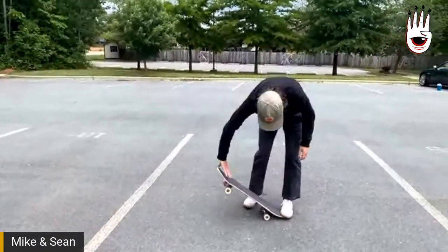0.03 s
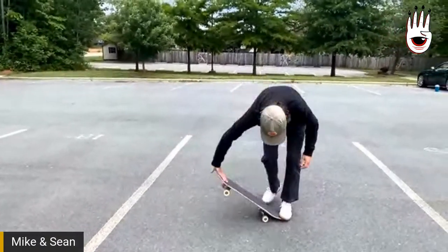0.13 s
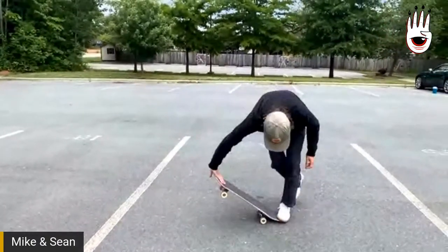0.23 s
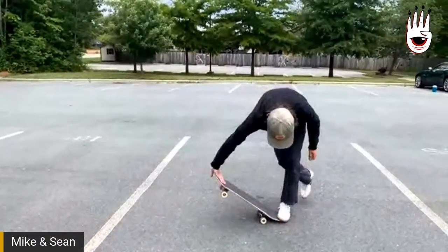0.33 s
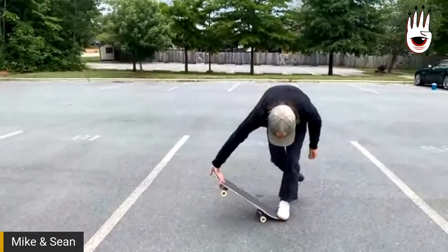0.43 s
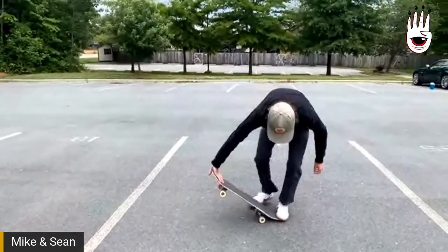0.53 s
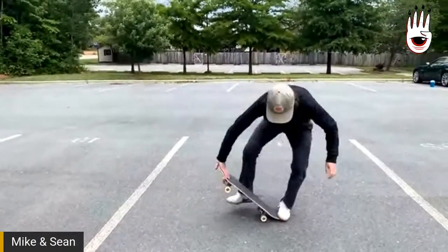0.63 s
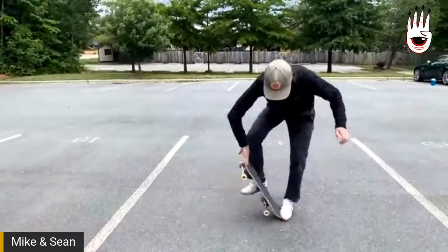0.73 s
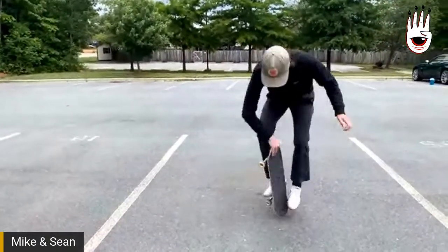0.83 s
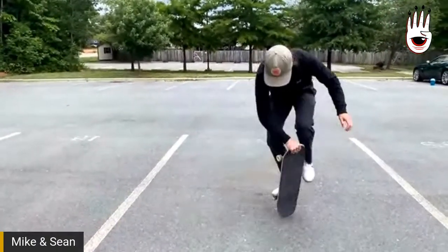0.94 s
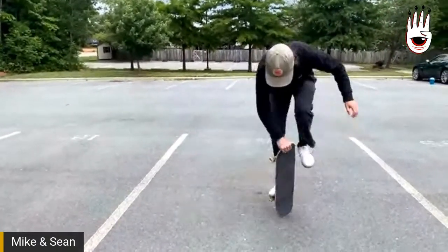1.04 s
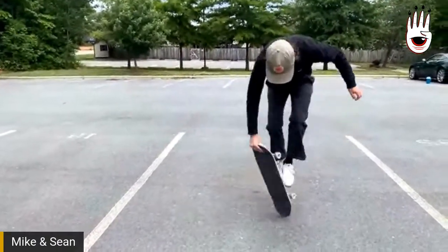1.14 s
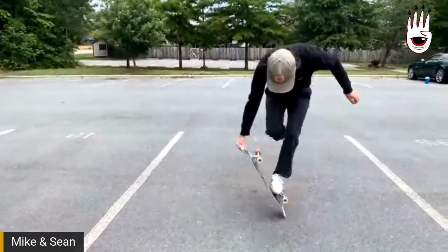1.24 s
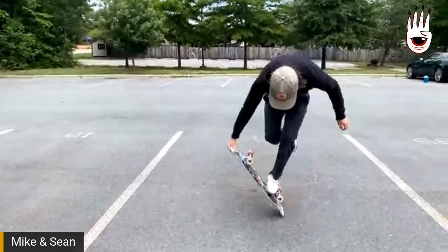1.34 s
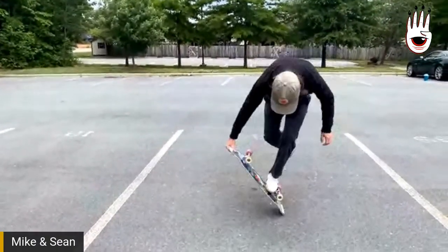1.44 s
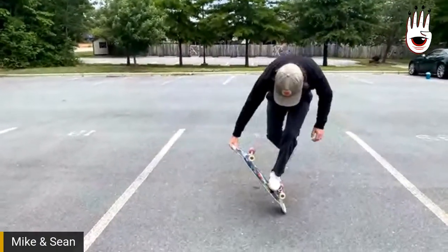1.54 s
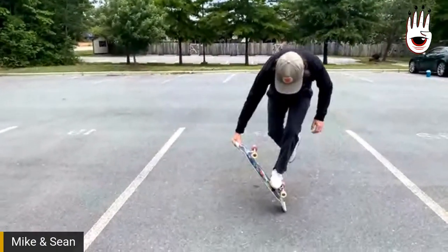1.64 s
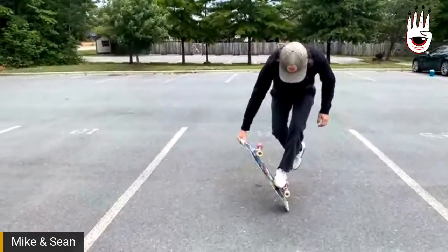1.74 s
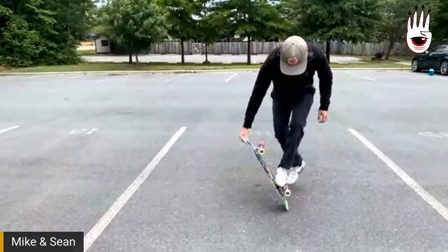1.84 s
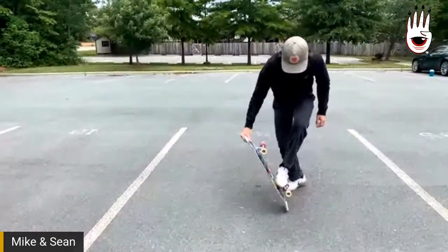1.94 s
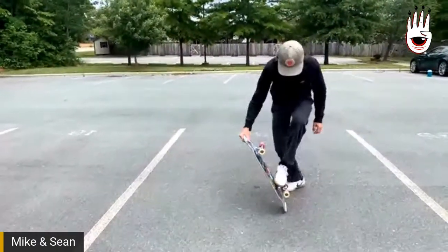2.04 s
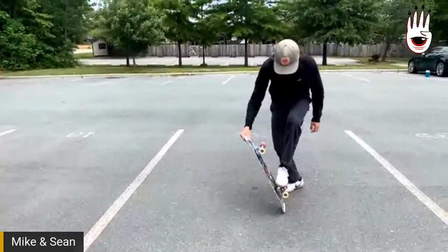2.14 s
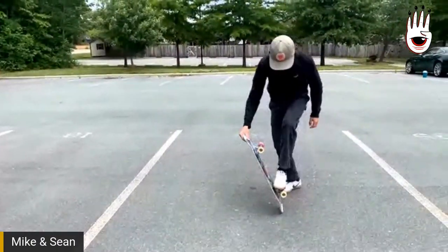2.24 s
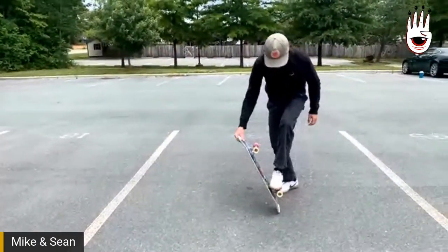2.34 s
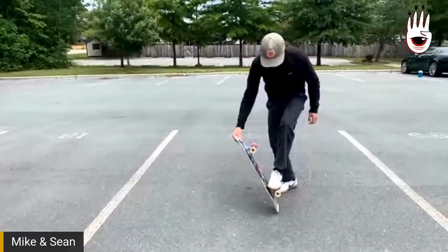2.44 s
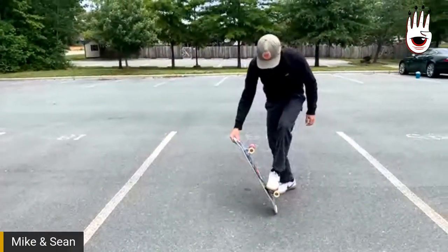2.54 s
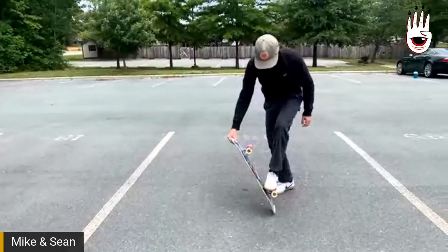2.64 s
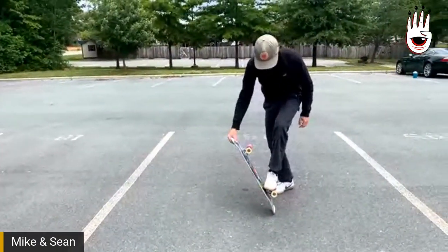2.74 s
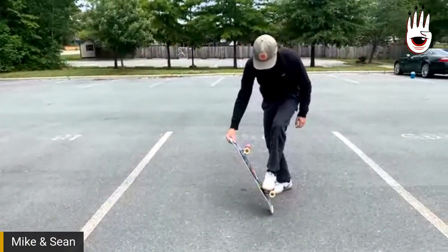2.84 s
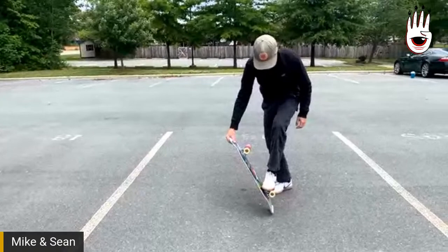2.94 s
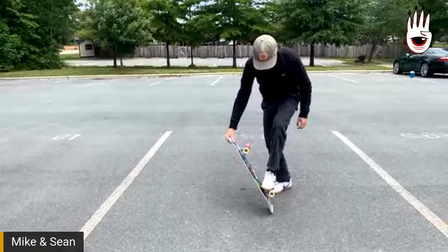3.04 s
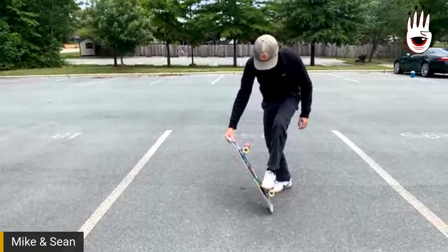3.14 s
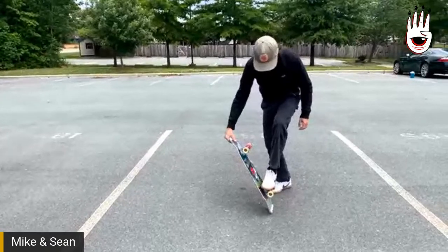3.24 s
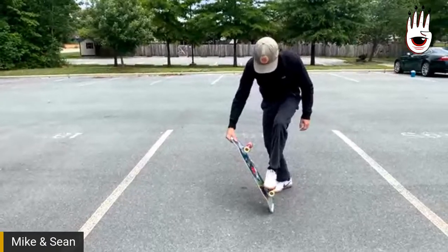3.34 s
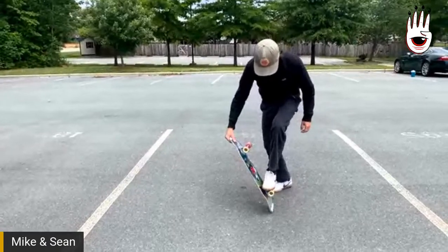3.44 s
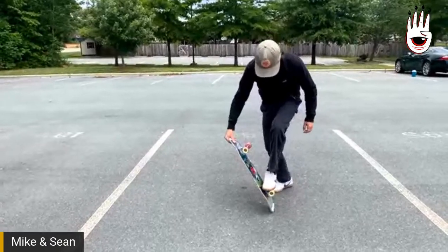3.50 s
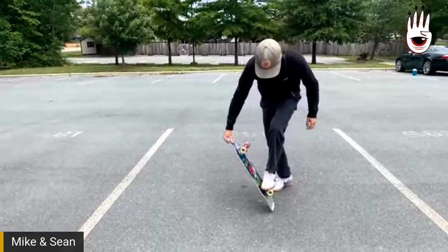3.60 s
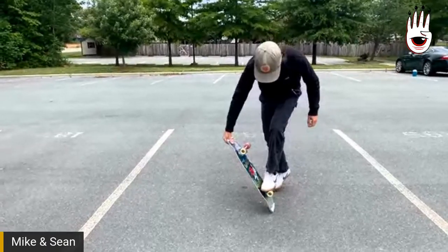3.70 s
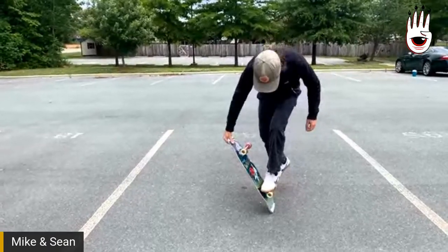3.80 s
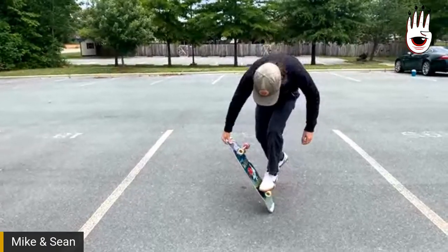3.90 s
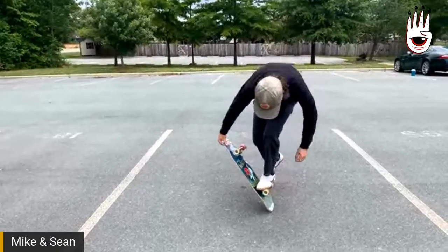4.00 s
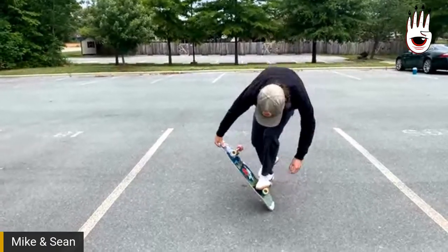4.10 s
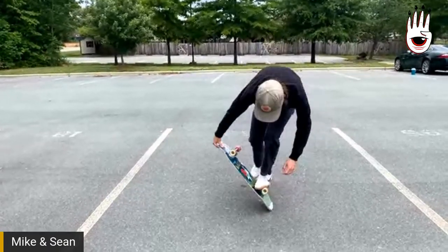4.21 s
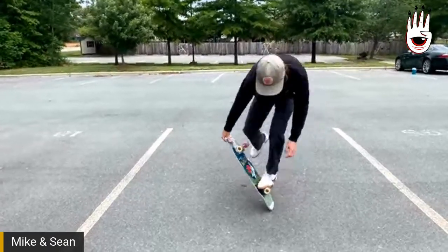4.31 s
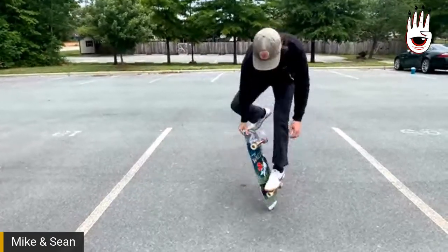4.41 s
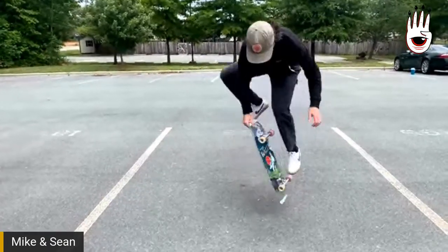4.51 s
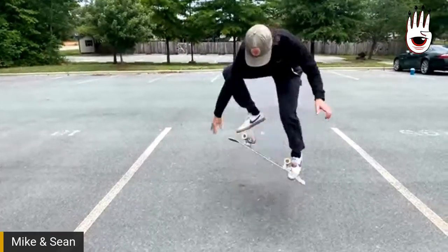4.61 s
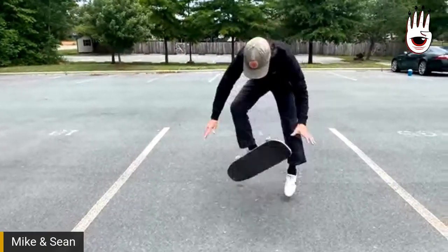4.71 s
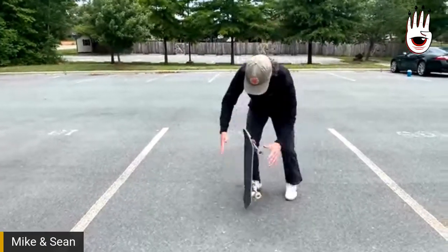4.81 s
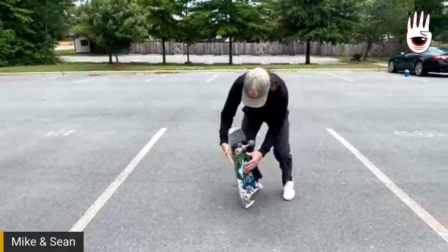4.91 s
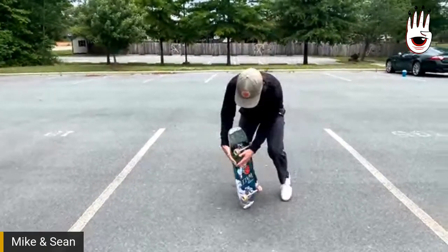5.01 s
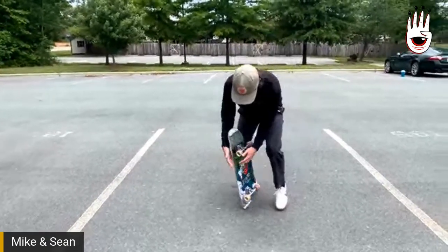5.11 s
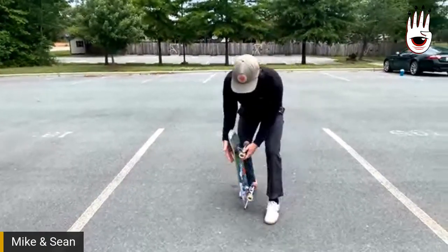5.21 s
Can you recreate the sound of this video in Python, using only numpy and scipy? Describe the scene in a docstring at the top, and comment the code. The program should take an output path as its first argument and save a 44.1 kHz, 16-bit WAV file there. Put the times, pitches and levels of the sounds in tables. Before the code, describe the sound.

In an open asphalt car park, a skateboard ticks and scrapes softly, then its tail knocks the ground in a tight rattling burst with lighter taps after. A long near-silence follows, with tiny metallic ticks, low distant traffic and thin bird chirps. Finally a short scuff and squeak lead to a knock and one very loud, sharp clack. The board is close to the microphone, dry with a faint outdoor tail.

```python
"""Skateboard trick on a car park

Place: an empty asphalt car park; a skateboarder tries a trick, holding the board by its nose.
Close to the microphone the tail scrapes and knocks, the trucks tick under his shoe, the sole squeaks, and
the board flips and lands with one sharp clack. Blows and drags ring decaying modes of wood and metal over noisy grit.
Far off, traffic rumbles as coloured noise and birds chirp faintly in the trees as trilled sines.
Asphalt, fence and trees send back a faint tail of decaying noise."""
import sys
import numpy as np
from scipy import signal
from scipy.fft import rfft, irfft, next_fast_len
from scipy.io import wavfile

SR = 44100
rng = np.random.default_rng(int(sys.argv[2]) if len(sys.argv) > 2 else 0)


def to_wav(sig):
    """Store sig (one row per channel, or 1-D mono) as 16-bit WAV at the path in sys.argv[1].

    Samples outside -1..1 are clipped; the rate is SR.
    """
    pcm = np.clip(np.atleast_2d(sig), -1, 1) * 32767
    pcm = np.round(pcm).astype(np.int16)
    wavfile.write(sys.argv[1], SR, pcm.T)  # frames by channels


N = 231789   # samples

# bending modes of the wooden deck: (frequency [Hz], relative level [dB], undamped t60 [s])
DECK_MODES = [(90, -21, 0.012), (162, -11, 0.012), (294.2, -3.5, 0.048), (495, -12, 0.028),
              (662, 3.5, 0.014), (786.5, -1.5, 0.023), (966, -12, 0.019), (1162, -19.5, 0.047),
              (1303, -22.5, 0.075), (1430, -15, 0.031), (1617, -19.5, 0.06), (1717, -15.5, 0.037),
              (1895, -11, 0.016), (2094, -22.5, 0.043), (2337, -15, 0.026), (2660, -14.5, 0.027),
              (2918, -7.5, 0.014), (2942, -14, 0.038), (2982, -8.5, 0.0062), (3740, -16, 0.02),
              (4260, -17, 0.015), (5280, -26.5, 0.046), (6200, -26, 0.027)]
# modes of a metal truck: (frequency [Hz], relative level [dB], t60 [s])
TRUCK_MODES = [(1070, 13.5, 0.01), (1760, -9.5, 0.013), (2510, -15, 0.0056), (2934, -0.5, 0.0067),
               (3430, -16, 0.019), (3920, -5, 0.011), (4940, -7, 0.0085), (8800, -9, 0.033),
               (9800, -7, 0.026), (10760, 3, 0.00442), (12600, -21, .002)]
# the deck strikes the asphalt, then rattles and skids: (time [s], peak level [dB], centre of excited modes [Hz],
#   their spread [octaves], contact time [s], grit crack level [dB], rattle level [dB],
#   skidding grit level [dB], rattle t60 [s])
DECK_KNOCKS = [(0.923, -19.5, 1430, 2, 0.00058, -33, -24.5, -36.5, 0.097),
               (0.9438, -19, 1920, 1.74, 0.00096, -26, -32.5, -38, 0.065),
               (.9660, -19, 1490, 0.49, 0.00096, -28.5, -32.5, -45.5, 0.099),
               (1.1658, -27.5, 2980, 0.96, 0.0043, -34, -41, -41, 0.27),
               (1.281, -25, 1660, 0.89, 0.00049, -26, -49.5, -51.5, 0.23),
               (4.5473, -19.5, 970, 0.84, 0.0038, -25.5, -43.5, -45, 0.17),
               (4.8607, 7, 842, 3.4, 0.0014, -8.5, -35, -38.5, 0.33),
               (4.955, -26.5, 1280, 1.9, 0.0028, -40, -42.5, -47.5, 0.27)]
# light, clean taps on the deck from shoe, hand or a glancing touch:
#   (time [s], peak level [dB], centre of excited modes [Hz])
DECK_TAPS = [(1.225, -33, 435), (1.2660, -26.5, 1190), (4.8035, -26.5, 1100), (4.848, -16, 1096),
             (4.8568, -15.5, 1255), (4.9850, -34.5, 1450)]
# ticks of the trucks: (time [s], peak level [dB], centre of excited modes [Hz], grit crack level [dB])
TRUCK_TICKS = [(.0315, -37, 2250, -56.5), (0.15, -43.5, 2135, -56), (0.1958, -48.5, 3870, -41.5),
               (.6680, -45, 4430, -38.5), (0.6867, -40.5, 3170, -41), (0.828, -31.5, 3500, -33.5),
               (1.1683, -27.5, 5000, -42), (1.9471, -40, 2020, -52), (1.9552, -33, 2150, -41),
               (2.4568, -53.5, 13100, -77), (3.4400, -61, 6000, -40), (3.4737, -70, 7000, -51),
               (3.9320, -40, 3400, -38), (4.443, -65, 8020, -52)]
# wood and shoe dragged over asphalt: (peak time [s], length [s], deck level [dB], centre of excited modes [Hz],
#   their spread [octaves], grit level [dB])
DRAG_STROKES = [(0.198, 0.15, -57.5, 2050, 1.6, -63), (0.679, .11, -57.5, 3040, 0.47, -56),
                (0.826, .12, -56, 3220, 0.74, -54), (1.116, 0.062, -62, 1370, 0.51, -62),
                (3.256, 0.11, -73.5, 2850, 1.15, -81), (3.476, 0.073, -89, 3510, 1.23, -59),
                (4.48, .115, -52, 1430, 1.7, -54)]
# colour of crushed grit: (frequency [Hz], relative level [dB])
GRIT_COLOUR = [(50, -46), (300, -5), (1200, -1.5), (3200, -7), (4300, -6.5), (5500, -7), (7100, -5),
               (8600, 4), (10600, -3), (11700, -11), (12700, -31), (15500, -31.5)]
# song of a small bird, whistles and buzzes: (start [s], length [s], pitch [Hz],
#   trill swing times the root of 2 [Hz], level [dB])
BIRD_SONG = [(2.614, 0.068, 7380, 30, -69), (2.634, 0.1, 8050, 1130, -64.5), (2.767, 0.077, 7580, 850, -68),
             (2.778, 0.07, 6540, 120, -76.5), (2.868, 0.1, 6700, 1100, -82)]
# one falling chirp, repeated by a farther bird: (start [s], length [s], pitch [Hz], level [dB])
FAR_CALLS = [(0.49, 0.073, 2920, -75), (2.315, .096, 2870, -76.5), (3.705, 0.12, 3040, -85),
             (4.106, .11, 2640, -79.5), (4.619, 0.041, 3230, -63.5)]
# colour of the far traffic: (frequency [Hz], relative level [dB per Hz])
TRAFFIC_COLOUR = [(15, -64), (25, -16), (49, -15), (82, -6), (178, 0), (209, -5), (246, -6), (389, -11.5),
                  (433, -12), (1660, -22.5), (1900, -27), (2420, -29), (5010, -43), (9050, -41.5),
                  (15500, -61)]
# colour of the sound scattered back by the lot: (frequency [Hz], relative level [dB])
LOT_COLOUR = [(100, -13.5), (300, 0.5), (1500, 2), (3000, 0), (6000, -10), (9000, -7), (14000, -18.5)]

SKID_LEAD_S = 0.018   # the edge grazes the ground this long before the blow
BOUNCE_S, BOUNCE_JITTER = 0.012, 0.12   # time between rebounds; its unevenness as a share
RATTLE_HZ, RATTLE_OCTAVES = 1630, 1.51   # modes that rebounds and skids excite
REBOUND_CONTACT_S, REBOUND_CHANCE_DB = 0.0008, 3.0
REBOUND_ABOVE_SKID_DB, REBOUND_GRIT_DB = 9.0, 7.0   # peak of a rebound over the skid's deck and grit levels

# while he balances, the trucks also tick faintly at random
BALANCING_S = (2.0, 4.4)   # start and end
FAINT_TICK_DB, FAINT_TICK_HZ, FAINT_GRIT_DB = -68, 8000, -63

SCRAPE_RISE = 0.5   # share of a stroke spent swelling
SCRAPE_EDGE_DB = -25   # a stroke swells from this level and fades back to it
SQUEAK_S, SQUEAK_LENGTH_S, SQUEAK_HZ, SQUEAK_DB = 4.456, 0.046, 790, -52
SQUEAK_WAVER, SQUEAK_UNEVEN_DB = 0.07, 5.0

LOT_T60_S, LOT_DB = 0.23, -33.5
SONG_TRILL_HZ, SONG_WAVER = 800, 0.38
# the swing of the far call is its depth over the root of 2
CALL_TRILL_HZ, CALL_DEPTH_HZ, CALL_WAVER, CALL_SAG_HZ_PER_S = 399, 442, 0.785, 2190
TRAFFIC_DB = -62
CUTOFF_HZ = 15800


def knocks(crack_t60=0.017):
    """Each blow rings the deck and crushes some grit; the board rebounds and skids."""
    out = np.zeros(N)
    for s, db, centre_hz, octaves, contact_s, grit_db, rattle_db, skid_grit_db, t60 in DECK_KNOCKS:
        add(out, s, blow(db, centre_hz, octaves, contact_s))
        add(out, s, from_db(grit_db) * pressed(crack(crack_t60), contact_s))
        add(out, s, rebounds(rattle_db, skid_grit_db, t60))
        add(out, s - SKID_LEAD_S, skid(rattle_db, skid_grit_db, t60))
    return out


def blow(db, centre_hz, octaves, contact_s):
    """One contact rings the deck."""
    return from_db(db) * pressed(deck(centre_hz, octaves), contact_s)


def rebounds(db, grit_db, t60, crack_t60=0.021, count=9):
    """The deck chatters on the ground in a dying run of touches, each at a new spot and crushing a little grit."""
    out = np.zeros(SR // 2)
    for k, (late, strength, spot) in enumerate(rng.standard_normal((count, 3)), 1):
        s = BOUNCE_S * (k + BOUNCE_JITTER * late)
        fall_db = -60 * s / t60
        touch_db = fall_db + REBOUND_CHANCE_DB * strength
        centre_hz = RATTLE_HZ * 2 ** (0.3 * spot)
        add(out, s, blow(db + REBOUND_ABOVE_SKID_DB + touch_db, centre_hz, RATTLE_OCTAVES, REBOUND_CONTACT_S))
        grit_crack = pressed(crack(crack_t60), REBOUND_CONTACT_S)
        add(out, s, from_db(grit_db + REBOUND_GRIT_DB + touch_db) * grit_crack)
    return out


def skid(db, grit_db, t60, lead_db=-34, grit_fades=1.3):
    """The edge digs in just before a blow and slides to rest after it; the grit fades faster."""
    t = seconds(0.35) - SKID_LEAD_S   # zero at the blow
    rise_db = lead_db * np.maximum(-t, 0) / SKID_LEAD_S
    fall_db = -60 * np.maximum(t, 0) / t60
    deck_db = db + rise_db + fall_db
    crunch_db = grit_db + rise_db + grit_fades * fall_db
    return dragged(deck_db, crunch_db, RATTLE_HZ, RATTLE_OCTAVES)


def taps(octaves=0.39, contact_s=0.00087, damping=2.1, grit_db=-27, crack_t60=0.016):
    """A light touch rings only a few neighbouring modes, damps them and hardly stirs the grit."""
    out = np.zeros(N)
    for s, db, centre_hz in DECK_TAPS:
        add(out, s, from_db(db) * pressed(deck(centre_hz, octaves, damping), contact_s))
        add(out, s, from_db(db + grit_db) * pressed(crack(crack_t60), contact_s))
    return out


def ticks(octaves=0.56, contact_s=0.0012, crack_t60=0.016,
          chatter_per_s=1500, chatter_db=1.5, chatter_t60=0.019):
    """Loose metal chatters for an instant as weight comes on and off the board."""
    out, t = np.zeros(N), seconds(0.03)
    for s, db, centre_hz, grit_db in TRUCK_TICKS + faint_ticks():
        chatter = grains(len(t), chatter_per_s, chatter_db)
        chatter[0] = 2   # a firm first touch
        chatter = chatter * from_db(-60 * t / chatter_t60)
        metal = driven(chatter, ringing(TRUCK_MODES, centre_hz, octaves))
        add(out, s, from_db(db) * pressed(metal, contact_s))
        add(out, s, from_db(grit_db) * pressed(crack(crack_t60), contact_s))
    return out


def faint_ticks(count=5):
    """Small shifts of weight while he balances, as rows like those of TRUCK_TICKS."""
    shares = (np.arange(count) + rng.random(count)) / count
    times = np.interp(shares, [0, 1], BALANCING_S)
    chance_db = 2 * rng.standard_normal(count)
    return [(s, FAINT_TICK_DB + db, FAINT_TICK_HZ, FAINT_GRIT_DB + db) for s, db in zip(times, chance_db)]


def scrapes():
    """Wood and shoe drag over the asphalt; each stroke swells and fades."""
    out = np.zeros(N)
    for peak, length, db, centre_hz, octaves, grit_db in DRAG_STROKES:
        t, rise_s = seconds(length), SCRAPE_RISE * length
        swell_db = np.interp(t, [0, rise_s, length], [SCRAPE_EDGE_DB, 0, SCRAPE_EDGE_DB])
        add(out, peak - rise_s, dragged(db + swell_db, grit_db + swell_db, centre_hz, octaves))
    return out


def dragged(swell_db, grit_swell_db, centre_hz, octaves, catches_per_s=220, catch_db=5.5,
            slips_per_s=1600, slip_db=3.0, grit_per_s=9000, grit_spread_db=5.0, damping=2.1):
    """A sliding contact keeps catching; tiny slips drive the deck, damped by the contact, and crunch the grit."""
    count = len(swell_db)
    catching_db = catch_db * drift(count, catches_per_s)
    slips = rms_one(grains(count, slips_per_s, slip_db)) * from_db(swell_db + catching_db)
    out = driven(slips, deck(centre_hz, octaves, damping))
    crunch = coloured(grains(count, grit_per_s, grit_spread_db), GRIT_COLOUR)
    add(out, 0, from_db(grit_swell_db + catching_db) * crunch)
    return out


def squeak(waver_per_s=300, centre_hz=1500, octaves=2.2):
    """As he pushes off, the rubber sole sticks and slips at a wavering rate, with uneven force, and drives the deck."""
    out, count = np.zeros(N), len(seconds(SQUEAK_LENGTH_S))
    cycles = np.cumsum(SQUEAK_HZ * (1 + SQUEAK_WAVER * drift(count, waver_per_s))) / SR
    uneven = from_db(SQUEAK_UNEVEN_DB * rng.standard_normal(count))
    slips = np.diff(np.floor(cycles), prepend=0) * uneven   # one click per whole cycle
    force = rms_one(slips * signal.windows.tukey(count, 0.5))
    add(out, SQUEAK_S, from_db(SQUEAK_DB) * driven(force, deck(centre_hz, octaves)))
    return out


def deck(centre_hz, octaves, damping=1, lowest_hz=105):
    """A narrow plank radiates little below the modes that are excited."""
    corner_hz = max(centre_hz / 2 ** (1 + octaves), lowest_hz)
    high_pass = signal.butter(2, corner_hz, "high", fs=SR, output="sos")
    return signal.sosfilt(high_pass, ringing(DECK_MODES, centre_hz, octaves, damping))


def ringing(modes, centre_hz, octaves, damping=1, chance_db=0.5):
    """Answer of a body to one blow; the place and hardness of the contact decide which modes ring."""
    t = seconds(0.12)
    hz, db, t60 = np.transpose(modes)[:, :, None]
    away = np.log2(hz / centre_hz) / octaves
    strength = from_db(chance_db * rng.standard_normal(hz.shape)) / (1 + away ** 2) ** 2
    sines = from_db(db - 60 * damping * t / t60) * np.sin(2 * np.pi * hz * t)
    signs = (-1) ** np.arange(len(modes))   # neighbouring modes start in opposite directions
    return signs @ (strength * sines)


def crack(t60):
    """Grit crushed under a blow: a short bright burst."""
    t = seconds(0.06)
    return coloured(rng.standard_normal(len(t)), GRIT_COLOUR) * from_db(-60 * t / t60)


def pressed(sound, contact_s):
    """A blow builds up while the two bodies press together; peak 1."""
    t = np.arange(len(sound)) / SR
    return peak_one(sound * (1 - np.exp(-(t / contact_s) ** 2)))


def driven(force, answer):
    """A body with this answer to one click, driven by a force; the answer is scaled to unit energy."""
    return signal.fftconvolve(force, answer / np.linalg.norm(answer))


def car_park(x, build_s=0.016):
    """Asphalt, fence and trees scatter a faint tail back."""
    t = seconds(0.8)
    fall = from_db(-60 * t / LOT_T60_S)
    tail = coloured(rng.standard_normal(len(t)), LOT_COLOUR) * fall * (1 - np.exp(-t / build_s))
    return from_db(LOT_DB) * signal.fftconvolve(x, tail / np.linalg.norm(tail))[:N]


def birds():
    """One bird sings a short high phrase; a farther one calls now and then."""
    out = np.zeros(N)
    for start, length, hz, depth_hz, db in BIRD_SONG:
        add(out, start, from_db(db) * chirp(length, hz, depth_hz, SONG_TRILL_HZ, SONG_WAVER))
    for start, length, hz, db in FAR_CALLS:
        call = chirp(length, hz, CALL_DEPTH_HZ, CALL_TRILL_HZ, CALL_WAVER, CALL_SAG_HZ_PER_S)
        add(out, start, from_db(db) * call)
    return out


def chirp(length, hz, depth_hz, trill_hz, waver, sag_hz_per_s=0,
          flutter_db=2.5, flutter_per_s=100, wobble=0.17, wobble_per_s=70):
    """A thin fluttering whistle, spread into a wobbling buzz by a fast uneven trill; rms 1."""
    t = seconds(length)
    trill = np.sin(2 * np.pi * trill_hz * t) + waver * drift(len(t), 2 * trill_hz)
    sagging_hz = hz - sag_hz_per_s * (t - length / 2)
    pitch = sagging_hz + depth_hz * (trill / np.sqrt(2) + wobble * drift(len(t), wobble_per_s))
    loudness = signal.windows.tukey(len(t), 0.5) * from_db(flutter_db * drift(len(t), flutter_per_s))
    return rms_one(loudness * np.sin(2 * np.pi * np.cumsum(pitch) / SR))


def traffic():
    """Far traffic blends into a steady low rumble: coloured noise."""
    return from_db(TRAFFIC_DB) * coloured(rng.standard_normal(N), TRAFFIC_COLOUR)


def from_db(db):
    """Decibels to gain."""
    return 10 ** (np.asarray(db) / 20)


def rms_one(x):
    """Scale to rms 1."""
    return x / np.sqrt(np.mean(x ** 2) + 1e-20)


def peak_one(x):
    """Scale to peak 1."""
    return x / (np.abs(x).max() + 1e-20)


def seconds(length):
    """Time axis of a short sound, at least 64 samples long."""
    return np.arange(max(int(length * SR), 64)) / SR


def add(out, start, sound):
    """Mix a sound in at its start time."""
    at = max(round(start * SR), 0)
    out[at:at + len(sound)] += sound[:max(len(out) - at, 0)]


def coloured(x, spectrum):
    """Give a steady noise a spectrum; rms 1."""
    hz, db = np.transpose(spectrum)
    size = next_fast_len(len(x))
    bins = np.maximum(np.fft.rfftfreq(size, 1 / SR), 1)
    gain = from_db(np.interp(np.log(bins), np.log(hz), db))
    return rms_one(irfft(rfft(x, size) * gain, size)[:len(x)])


def grains(count, per_s, spread_db):
    """Random clicks of uneven size, as stones catch and let go."""
    sizes = from_db(spread_db * np.minimum(rng.exponential(1, count), 3))
    signs = rng.choice([-1, 1], count)
    return sizes * signs * (rng.random(count) < per_s / SR) + 1e-9   # never wholly silent


def drift(count, per_s):
    """Chance values joined by straight lines, a new one per_s times a second; each drawn with spread 1."""
    steps = np.arange(count) * per_s / SR
    values = rng.standard_normal(count)
    return np.interp(steps, np.arange(count), values)


def scene(bass_cut_hz=50):
    """The board and its echo over the far traffic and the birds."""
    board = knocks() + taps() + ticks() + scrapes() + squeak()
    high_pass = signal.butter(2, bass_cut_hz, "high", fs=SR, output="sos")
    board = signal.sosfilt(high_pass, board)   # too small to radiate deep bass
    return (board + car_park(board) + traffic() + birds())[None]


def record(dry, top=1.0, coupling_hz=32):
    """The loudest peaks are squashed; the deepest bass and the top are cut."""
    held = dry / (1 + (dry / top) ** 4) ** (1 / 4)
    high_pass = signal.butter(2, coupling_hz, "high", fs=SR, output="sos")
    held = signal.sosfilt(high_pass, held)
    low_pass = signal.ellip(10, 0.1, 80, CUTOFF_HZ, fs=SR, output="sos")
    return signal.sosfilt(low_pass, held)


dry = scene()
out = record(dry)
to_wav(out)
```